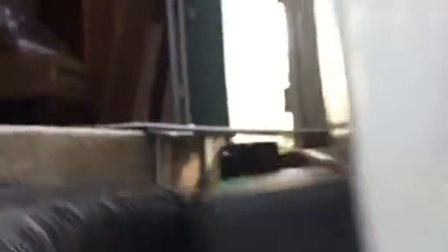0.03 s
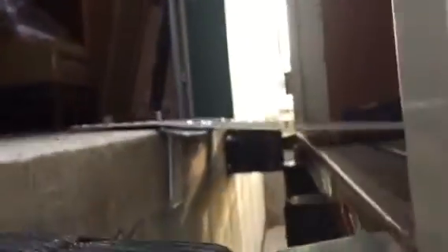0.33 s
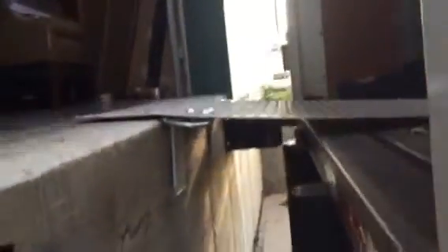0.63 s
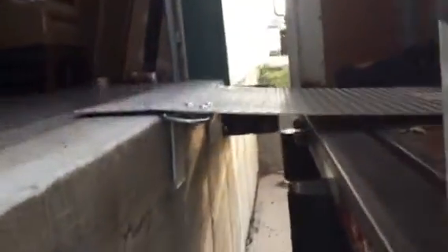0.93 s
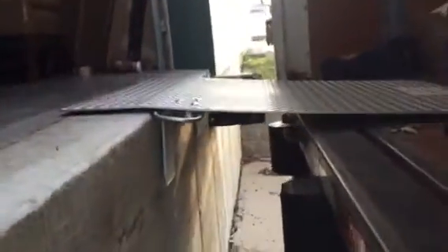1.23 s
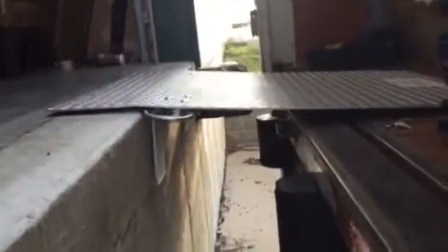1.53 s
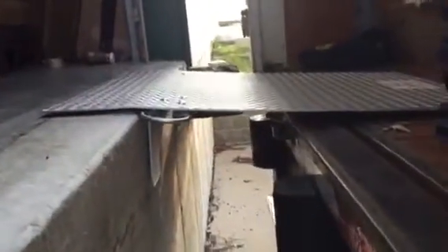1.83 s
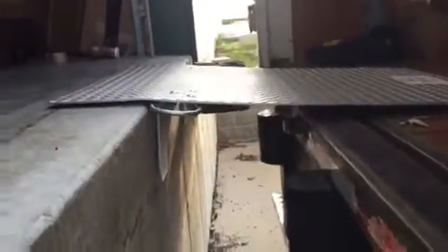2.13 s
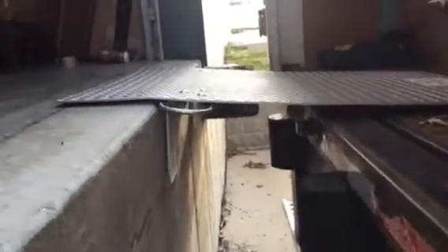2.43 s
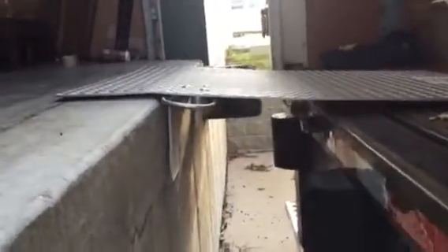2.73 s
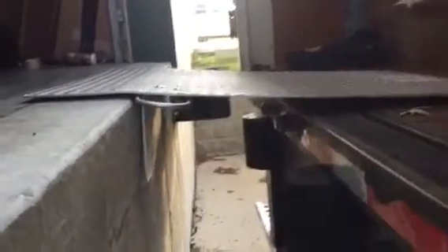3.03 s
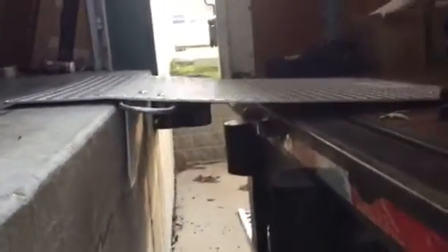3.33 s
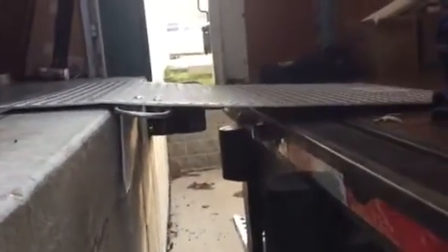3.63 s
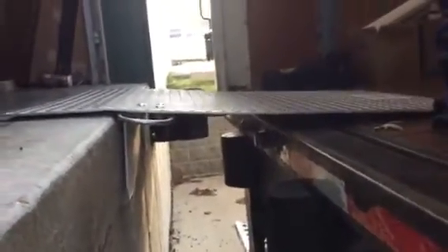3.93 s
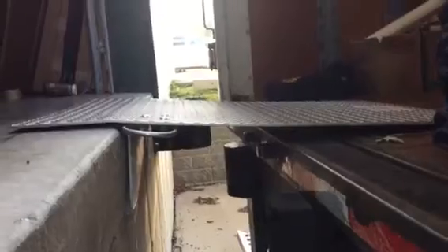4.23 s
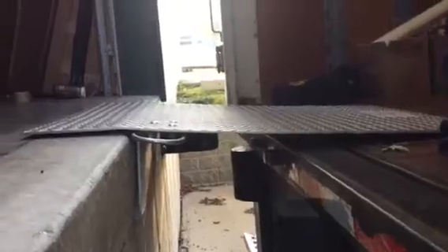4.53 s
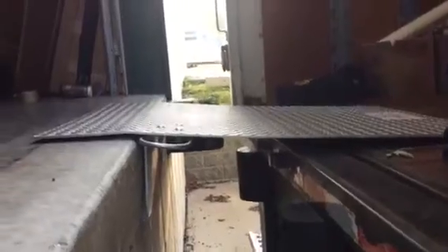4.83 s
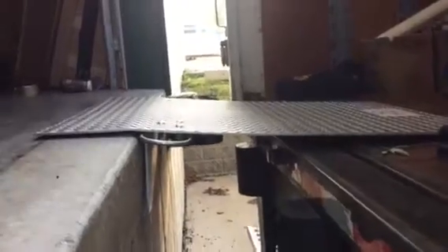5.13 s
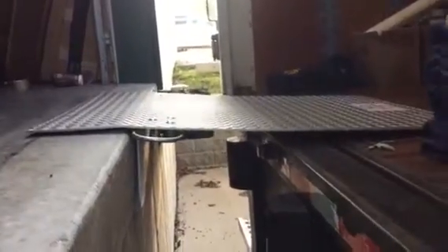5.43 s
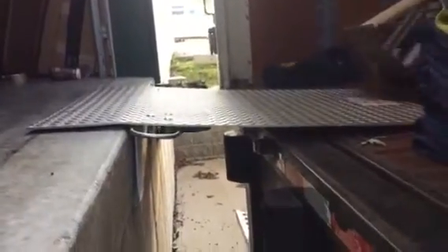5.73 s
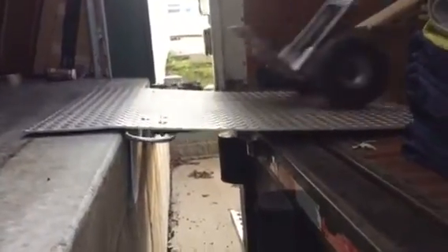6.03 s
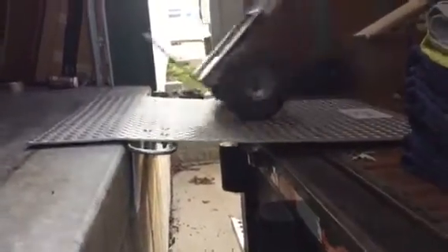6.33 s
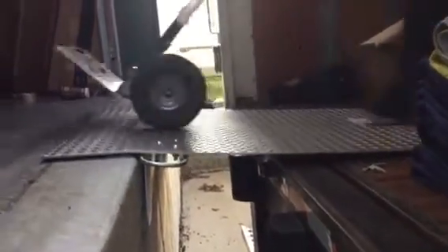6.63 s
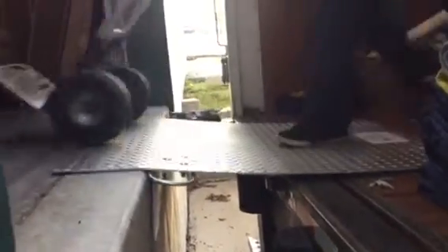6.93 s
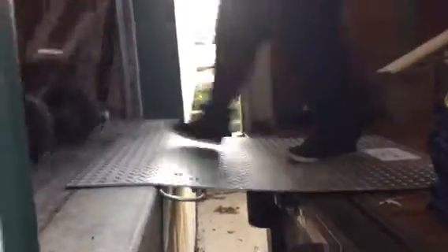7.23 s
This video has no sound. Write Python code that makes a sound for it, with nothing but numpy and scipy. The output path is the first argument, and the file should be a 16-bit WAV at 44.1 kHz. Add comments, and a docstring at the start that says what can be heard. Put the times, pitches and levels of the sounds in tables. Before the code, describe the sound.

Close rubbing and scuffing on the microphone, then a hand truck rolls over a metal dock plate with loud, low, ringing bangs.

```python
"""Hands and a sleeve rub and scuff right at the microphone as a camera is set in place on a loading dock,
over a low outdoor rumble. Then a hand truck rolls nearer across a metal dock plate, which slams on its
supports, rattles and rings, and a foot lands on it as the wheels leave. The bay answers each blow
and the camera's gain ducks."""
import sys
import numpy as np
from scipy import signal
from scipy.fft import rfft, irfft, next_fast_len
from scipy.io import wavfile
from scipy.ndimage import uniform_filter1d, map_coordinates

SR = 44100
rng = np.random.default_rng(int(sys.argv[2]) if len(sys.argv) > 2 else 0)


def to_wav(s):
    """Save 16-bit WAV."""
    ch = np.atleast_2d(s).T  # columns
    pcm = np.round(np.clip(ch, -1, 1) * 32767)  # PCM
    wavfile.write(sys.argv[1], SR, pcm.astype(np.int16))


N = 325458

# The plate strikes its supports. Each row: start in seconds, level in dB, contact hardness in dB.
BLOWS = [(5.962, -3.5, -15), (6.049, -10.5, -15.5), (6.09, -6, -18.5), (6.119, -13, -21),
         (6.14, 3.5, -15.5), (6.158, -7.5, -12), (6.2, -8, -19), (6.355, -19.5, -27), (6.743, -23, -16),
         (6.79, -14.5, -12), (6.845, -9, -9.5), (6.9, -7, -12), (6.965, -13, -24), (7.159, -27, -8)]
# The plate's strong modes, each a frequency in Hz.
MODE_HZ = [111, 167.5, 190, 243, 286, 300, 334, 378, 386, 410, 469, 554, 563, 747, 851, 886, 936, 987, 1018,
           1237, 1294, 1346, 1598, 1664, 1735, 1851, 1946, 2195, 2447, 2790]
# The same modes. Each row: level in dB struck at the truck end, at the dock end, t60 in seconds.
MODE_RESPONSE = [(-16, -33, 0.83), (1.5, -0.5, 0.87), (-4.5, 1, 0.77), (-13, -18, 0.67), (-7.5, -29, 0.75),
                 (-24, -4.5, 0.42), (-14.5, -36, 1), (-23, -11.5, 0.56), (-10, -21, 0.66), (-11, -12, 0.32),
                 (-8.5, -21, 0.75), (-2.5, -8, 0.53), (-22, 0.5, 0.15), (-3, 9, 0.099), (-12, -25, 0.31),
                 (-9, -20, 0.56), (-19, -14, 0.28), (2, 4, 0.16), (3.5, -2, 0.18), (1, -0.5, 0.21),
                 (4, -22, 0.11), (-2.5, -6, 0.22), (-4, 0, 0.22), (9, 8, 0.089), (11.5, -10, 0.055),
                 (1, -20, 0.13), (-1, -17, 0.14), (7, 17, 0.038), (4, 8, 0.076), (0, 5, 0.1)]
# The dense upper modes. Each row: frequency in Hz, level in dB.
CLANG_TONE = [(65, -12), (110, -1.5), (227, -1), (372, -3), (1050, -6.5), (1440, -8), (1680, -1),
              (2350, -2), (3840, -12), (4960, -22), (5260, -18.5), (7350, -29), (8940, -29), (10700, -46),
              (12000, -45.5), (15600, -67), (22000, -120)]
# How long they ring. Each row: frequency in Hz, t60 in seconds.
CLANG_DECAY = [(120, 0.85), (400, 0.45), (1000, 0.42), (2500, 0.16), (8000, 0.27)]


def plate():
    """Every blow feeds the plate's strong modes and a dense clang; slow bending waves delay the boom."""
    out, t = np.zeros(N), np.arange(SR) / SR
    hz = np.array(MODE_HZ)[:, None]
    truck_end_db, dock_end_db, t60 = np.transpose(MODE_RESPONSE)[:, :, None]
    clock = np.arange(round(5.9 * SR), N) / SR  # from just before the first blow
    energy = np.zeros((len(hz), len(clock)))
    decay = ((1 - np.exp(-t * hz / 5.1)) * amp(-60 * t / t60)) ** 2
    bending = lambda f: np.exp(-2j * np.pi * .22 * np.sqrt(f))  # travel time falls with frequency
    for s, db, hardness_db in BLOWS:
        boom_db = -5 - 0.22 * db  # weak blows are slow and give more boom for their size
        contact = [(280, boom_db), (800, 0), (2300, hardness_db + 7)]  # hard contacts are bright
        mode_db = truck_end_db if s < 6.5 else dock_end_db
        sizes = amp(db + mode_db + along(contact, hz) + rng.standard_normal(hz.shape))
        i = np.searchsorted(clock, s)
        energy[:, i:i + len(t)] += sizes ** 2 * decay[:, :len(clock) - i]
        waves = rng.standard_normal(len(t))  # reflections from the plate's edges
        waves[round(.0005 * SR)] += 17  # the direct wave
        clang = shaped(coloured(waves, CLANG_TONE), contact)
        add(out, s, amp(db - 12) * filtered(dying(clang, CLANG_DECAY), bending))
    detuning = rng.normal(0, 0.00077, energy.shape) * np.sqrt(hz)  # from the moving load
    phase = 2 * np.pi * (hz * clock + rng.random(hz.shape)) + np.cumsum(detuning, axis=1)
    ring = np.sqrt(energy) * np.sin(phase)
    add(out, clock[0], amp(-19) * ring.sum(axis=0))
    return out


# Tyres, axle and deck, heard from the dock. Each row: frequency in Hz, level in dB.
TREAD_TONE = [(1470, -22), (2500, -23), (2720, -21.5), (3240, -24), (4500, 3), (4930, -7), (5700, 2),
              (7680, -2.5), (10300, -2), (14000, -4.5), (15500, -7)]
AXLE_TONE = [(590, -56), (1000, -33), (1350, -26), (1930, 8.5), (2080, -4.5), (2300, -1.5), (2810, 2),
             (3240, 3.5), (3910, 1), (4910, -4.5), (5500, -3), (7150, -55.5), (12100, -120)]
DRUM_TONE = [(71, -43), (120, -18.5), (167, -10.5), (248, -13), (322, -11), (422, -16), (567, -9),
             (933, -12), (1800, -12.5), (2340, -15), (3960, -120)]
# Their course as the truck nears. Each holds: level in dB, rise in seconds, growth in dB a second.
TREAD_COURSE = (-47, 0.19, 3.7)
AXLE_COURSE = (-48.5, 0.1, 7.36)
DRUM_COURSE = (-43.5, 0.088, -1.55)
# The axle's resonances. Each row: frequency in Hz, width in Hz, lift in dB.
AXLE_RING = [(1874, 19, 3.5), (2244, 67, 13), (2417, 97, 9), (2770, 78, 7), (3900, 82, -4)]
ROLL_START_S, WHEELS_OFF_S, WHEELS_OFF_DB = 5.59, 6.96, -5
CHATTER_DB, CHATTER_T60_S = -25.5, 0.38


def hand_truck():
    """Tyres hiss on the tread pattern, the axle whirrs and the deck drums, most of all after a blow."""
    chatter, t = np.zeros(N), np.arange(SR) / SR
    for s, db, _ in BLOWS:
        add(chatter, s, amp(db + CHATTER_DB - 60 * t / CHATTER_T60_S) ** 2)
    tread = approach(*TREAD_COURSE) * coloured(grit(N, spiky=0.28), TREAD_TONE)
    axle = approach(*AXLE_COURSE) * amp(0.97 * wobble(40))
    axle *= resonant(coloured(grit(N, spiky=0.2), AXLE_TONE), AXLE_RING)
    drum = np.sqrt(approach(*DRUM_COURSE) ** 2 + chatter) * amp(0.45 * wobble(25))
    drum *= coloured(rng.standard_normal(N), DRUM_TONE)
    on_dock = np.clip((np.arange(N) / SR - WHEELS_OFF_S) / 0.046, 0, 1)
    return tread + axle + drum * amp(WHEELS_OFF_DB * on_dock)


def approach(db, rise_s, growth_db_per_s):
    """A rolling sound rises as the truck is pushed off, then grows or fades steadily."""
    age = np.maximum(np.arange(N) / SR - ROLL_START_S, 0)
    return np.minimum(age / rise_s, 1) ** 2 * amp(db + growth_db_per_s * age)


# The grip shifts on the camera. Each row: start in seconds, level in dB, hollow in Hz, hiss in dB.
SCUFFS = [(0.018, -47.5, 2280, -11), (0.329, -38.5, 6000, 2), (2.05, -37, 3440, -6), (2.138, -39, 1730, -7),
          (2.1847, -30.5, 1660, -19), (2.2119, -27.5, 1440, -11), (2.2503, -26.5, 1290, -11.5),
          (2.288, -35, 1750, -15), (2.4879, -35.5, 1610, -4), (2.5297, -41, 1170, -5),
          (2.6107, -29.5, 1490, -11), (2.6828, -32, 2090, -18), (2.8105, -29.5, 1850, -20),
          (2.8353, -30, 1840, -12), (2.878, -29.5, 1300, -11), (2.896, -23, 1380, -21),
          (3.034, -34, 1200, -14.5), (3.3743, -27, 1440, -12.5), (3.7912, -26, 2740, -13),
          (3.8165, -25, 2850, -9.5), (3.8793, -24.5, 2630, -15), (3.9452, -29, 2960, -15.5),
          (4.3191, -38, 3500, -7.5), (4.568, -51, 1120, -6), (4.602, -42.5, 1040, -43),
          (4.9555, -33.5, 1400, -6.5), (5.1023, -43.5, 3500, -19), (5.313, -34, 1794, -28),
          (5.3819, -32.5, 1820, -23), (5.4958, -37.5, 1520, -12), (5.5436, -42, 1100, -9)]
# The slipping hand. Each row: frequency in Hz, level in dB.
SCUFF_TONE = [(240, -34), (400, 0), (432, -33), (466, -12), (900, -6.5), (1260, -7), (2510, -8.5),
              (4030, -9), (4350, -10.5), (5560, -13), (10300, -18), (13900, -20), (15500, -27)]
SCUFF_FIRM_DB, SCUFF_T60_S = -39, 0.2


def scuffs():
    """Each shift of the grip lets go a dying shower of slips that rings the hollow under the hand."""
    out, t = np.zeros(N), np.arange(SR // 4) / SR
    for s, db, hollow_hz, hiss_db in SCUFFS:
        body_db = 1.5 - 9.5 * np.log2(hollow_hz / 1600)  # a smaller, higher hollow has less body
        tilt = [(1400, body_db), (3300, 0), (8000, hiss_db + 14), (14000, 1.3 * hiss_db + 17)]
        slips = shaped(coloured(grit(len(t), spiky=0.25), SCUFF_TONE), tilt)
        touched = [(hz, 110, 4) for hz in rng.uniform(1300, 7000, size=5)]
        slips = resonant(slips, [(hollow_hz, hollow_hz / 8, 8)] + touched)
        # Light, hissy touches swell; firm ones snap.
        firm = np.clip((db - SCUFF_FIRM_DB) / 10, 0, 1) * np.clip(-hiss_db / 18, 0, 1)
        rise_s = 0.0018 * (1 - firm) + 0.0019
        snap = 1.3 * firm * np.exp(-t / .005)
        fall = snap + amp(-60 * t / SCUFF_T60_S) + 0.018 * amp(-60 * t / 0.35)
        add(out, s, amp(db - 11) * slips * (1 - np.exp(-t / rise_s)) * fall)
    return out


# One long sleeve stroke across the microphone. Each row: time in seconds, drag in dB.
SLEEVE_DRAG = [(3.06, -69), (3.19, -46), (3.3, -49.5), (3.56, -49.5), (3.7, -41.5), (3.79, -42.5),
               (3.87, -56)]
# The cloth's hiss. Each row: frequency in Hz, level in dB.
SLEEVE_TONE = [(240, -36), (400, -17), (535, -7.5), (821, -22), (1260, -7.5), (1850, -10.5), (1990, -9.5),
               (4220, -4.5), (4920, -9.5), (14600, -14), (15500, -16)]
PRESS_S, PRESS_WIDTH_S = 3.534, 0.11
GAP_OPEN_HZ, GAP_CLOSED_HZ, GAP_CLOSES_S, GAP_CLOSING_S = 1744, 3200, 3.7, 0.04


def sleeve():
    """Cloth drags past the microphone; the gap under it narrows and its resonance climbs."""
    t = np.arange(N) / SR
    drag_db, = curves(SLEEVE_DRAG)
    pressure = np.exp(-((t - PRESS_S) / PRESS_WIDTH_S) ** 2 / 2)
    closed = 1 / (1 + np.exp(np.minimum((GAP_CLOSES_S - t) / GAP_CLOSING_S, 20)))
    gap_hz = GAP_OPEN_HZ + (GAP_CLOSED_HZ - GAP_OPEN_HZ) * closed
    rasp_db = -1.5 + 9.5 * pressure - 3 * closed  # the closed gap rings more weakly
    rasp = amp(rasp_db) * gliding(grit(N, spiky=0.078), gap_hz, width_hz=520)
    hiss = amp(3) * coloured(grit(N, spiky=0.28), SLEEVE_TONE)
    return during(SLEEVE_DRAG) * amp(drag_db + 0.89 * wobble(60)) * (hiss + rasp)


# Fingers stroke the case beside the microphone.
# Each row: start and length in seconds, hiss and rasp in dB, easing off in dB a second.
STROKES = [(0.02, 0.32, -71, -80, -15), (0.52, 0.025, -52, -63, 40), (0.569, 0.17, -46, -60.5, 21),
           (0.889, 0.18, -43.5, -58.5, 67), (1.124, 0.056, -55, -50.5, 28), (1.209, 0.095, -50, -57, 63),
           (1.348, 0.16, -52.5, -58, 21), (1.555, 0.11, -49, -50, 20), (1.646, 0.15, -47.5, -55, 25),
           (1.807, 0.068, -59.5, -57, 20), (1.891, 0.057, -59, -48, 30), (5.146, 0.068, -55, -56.5, 73),
           (5.284, 0.13, -62, -67, 20)]
# Skin gliding and skin pressed down. Each row: frequency in Hz, level in dB.
GLIDE_TONE = [(1180, -26), (2000, -2), (2610, -4.5), (3580, -11), (3970, -7.5), (4440, 0.5), (4880, -4.5),
              (6090, 1), (7420, -4.5), (14700, -7.5), (15500, -19)]
RASP_TONE = [(240, -49), (400, -23), (520, 0), (927, 1), (1740, -2), (2130, 0.5), (3160, -2.5), (4500, -11),
             (5850, -33), (9900, -120)]
# The camera case's resonances. Each row: frequency in Hz, width in Hz, lift in dB.
CASE_RING = [(2040, 210, 2), (2560, 50, 11), (3020, 190, -7), (6100, 300, 8)]
# Fingertips squeak at random between these two times, in seconds.
SQUEAK_SPAN_S = (0.95, 1.9)
SQUEAK_HZ, SQUEAK_DB, SQUEAK_T60_S, CATCHES_PER_S = 6080, -45, 0.031, 190


def fingers():
    """Skin slides on the case: a grainy hiss, a pressed rasp, catches that ring it, and tiny squeaks."""
    out, t = np.zeros(N), np.arange(SR // 16) / SR
    hiss = coloured(grit(N, spiky=0.4), GLIDE_TONE)
    catches = (rng.random(N) < CATCHES_PER_S / SR) * rng.uniform(.4, 1, N)
    catches = signal.fftconvolve(catches, np.exp(-t / .002))[:N] * rng.standard_normal(N)
    case = resonant(coloured(catches, RASP_TONE), CASE_RING)
    rasp = .68 * coloured(grit(N, spiky=.3), RASP_TONE) + .72 * case
    for s, length, hiss_db, rasp_db, easing in STROKES:
        out += stroke(s, length, easing) * (amp(hiss_db) * hiss + amp(rasp_db) * rasp)
    for s in rng.uniform(*SQUEAK_SPAN_S, size=12):
        hz = SQUEAK_HZ * rng.normal(1, .02)
        jitter = np.cumsum(rng.normal(0, 0.094, len(t)))
        envelope = (1 - np.exp(-t / 0.0019)) * amp(-60 * t / SQUEAK_T60_S)
        add(out, s, amp(SQUEAK_DB) * envelope * np.sin(2 * np.pi * hz * t + jitter))
    return out * amp(1.5 * wobble(69.4))


def stroke(start, length, easing_db_per_s, attack_s=0.008, release_s=0.032):
    """A stroke bites quickly, eases off (or swells, if the easing is negative) and lets go."""
    out, age = np.zeros(N), np.arange(SR // 2) / SR
    bite = 1 - np.exp(-age / attack_s)
    release = np.exp(-np.maximum(age - length, 0) / release_s)
    add(out, start, bite * amp(-easing_db_per_s * np.minimum(age, length)) * release)
    return out


# Fingernails on the camera. Each row: start in seconds, level in dB.
NAIL_TICKS = [(0.578, -28), (0.894, -29), (2.2126, -32), (2.685, -30), (3.019, -41), (5.238, -48),
              (5.286, -38), (5.314, -35), (5.384, -28.5), (5.495, -36)]
# A nail's click. Each row: frequency in Hz, level in dB.
TICK_TONE = [(700, -15), (1800, 0.5), (4000, -2), (7000, 2.5), (11000, -6), (15500, -25)]


def nails(t60_s=0.032):
    """A nail catches on the case and rings it for an instant."""
    out, t = np.zeros(N), np.arange(SR // 16) / SR
    for s, db in NAIL_TICKS:
        tick = resonant(coloured(rng.standard_normal(len(t)), TICK_TONE), CASE_RING)
        add(out, s, amp(db - 12) * tick * amp(-60 * t / t60_s))
    return out


# Bumps on the camera, then out on the plate. Each row: start in seconds, level in dB, resonance in Hz.
BUMPS = [(0.045, -35, 104), (0.085, -37, 130), (0.198, -43, 296), (0.356, -31, 230), (0.367, -26.5, 100),
         (1.135, -38, 277), (1.889, -28, 171), (2.185, -38, 400), (2.212, -40, 365), (2.25, -38, 376),
         (2.396, -42.5, 60), (2.835, -30, 198), (4.418, -32.5, 228), (4.589, -45, 186), (6.16, -24, 80),
         (6.944, -19, 180), (6.985, -22.5, 294), (7.039, -23.5, 187)]
# Their dull thud. Each row: frequency in Hz, level in dB.
BUMP_TONE = [(22, -50), (35, -15), (60, 0.5), (225, -6), (416, -16.5), (665, -15), (879, -26), (1160, -17),
             (1470, -28.5), (2000, -30), (2600, -50), (4400, -120)]


def bumps(overtone_ratio=2.98, t60_s=0.27):
    """Soft knocks of hands, tyres and shoes, each with a damped resonance and its overtone."""
    out, t = np.zeros(N), np.arange(SR // 4) / SR
    for s, db, body_hz in BUMPS:
        knock_db = 2 + 8 * np.log2(body_hz / 200)  # higher knocks are harder
        push = coloured(rng.standard_normal(len(t)), BUMP_TONE)
        push = shaped(push, [(200, 0), (550, knock_db)])
        push = resonant(push, [(body_hz, 70, 9), (overtone_ratio * body_hz, 40, 6.5)])
        add(out, s, amp(db - 7.5) * push * (1 - np.exp(-t / 0.0026)) * amp(-60 * t / t60_s))
    return out


# The bay around the microphone. Each row: frequency in Hz, t60 in seconds.
BAY_DECAY = [(150, 1), (1000, 0.22), (4000, 0.19), (12000, 0.13)]


def bay(x, delay_s=0.016):
    """The dock walls and the truck box answer with a short tail, longest in the bass."""
    tail = dying(rng.standard_normal(SR), BAY_DECAY)
    delayed = np.pad(x, (round(delay_s * SR), 0))
    return signal.fftconvolve(delayed, tail / np.linalg.norm(tail))[:N]


# The distant yard and the open air. Each row: frequency in Hz, level in dB.
RUMBLE_TONE = [(15, -71), (25, -37), (41, -10.5), (71, 1), (89, -3), (107, -12.5), (129, -9.5), (172, -17),
               (200, -15.5), (288, -27.5), (370, -33), (500, -30.5), (650, -51), (1100, -120)]
AIR_TONE = [(180, -21.5), (300, -2), (378, -25), (424, -20), (600, -25), (953, -13), (1160, -13.5),
            (2040, -18.5), (2140, -17.5), (3510, -34), (3940, -30), (15500, -38.5)]
# The air at the microphone. Each row: time in seconds, level in dB, hollow resonance in Hz.
AIR_COURSE = [(0.0, -59.5, 1039), (1.55, -59.5, 836.5), (2.05, -52, 906), (3.1, -56.5, 1107),
              (3.65, -50, 1148), (4.0, -59.5, 1218), (5.55, -58.5, 1134)]
# Its steady resonances. Each row: frequency in Hz, width in Hz, lift in dB.
AIR_RING = [(3050, 140, 0), (3430, 340, 5)]


def outdoors(rumble_db=-47):
    """Low rumble from the yard and faint air noise whose hollow colour shifts as the camera moves."""
    rumble = amp(rumble_db - 0.5 * wobble(6)) * coloured(rng.standard_normal(N), RUMBLE_TONE)
    air_db, hollow_hz = curves(AIR_COURSE)
    air = resonant(coloured(rng.standard_normal(N), AIR_TONE), AIR_RING)
    hollow = gliding(rng.standard_normal(N), hollow_hz, width_hz=124)
    return rumble + amp(air_db) * (amp(-4.5) * air + amp(-11) * hollow)


def amp(db):
    """Decibels to gain."""
    return 10 ** (np.asarray(db) / 20)


def unit(x):
    """Scale to rms 1."""
    return x / np.sqrt(np.mean(x ** 2) + 1e-20)


def along(points, hz):
    """Interpolate (Hz, value) points on a log axis."""
    f, v = np.transpose(points)
    return np.interp(np.log(hz + 1), np.log(f + 1), v)


def curves(rows):
    """One value per sample for each column after the time."""
    s, *cols = np.transpose(rows)
    return [np.interp(np.arange(N) / SR, s, c) for c in cols]


def during(rows):
    """1 while a table runs, with short soft edges."""
    t = np.arange(N) / SR
    return uniform_filter1d(((t >= rows[0][0]) & (t <= rows[-1][0])) * 1., size=400)


def wobble(rate):
    """A smooth random curve, rate knots a second."""
    knots = rng.standard_normal(int(N * rate / SR) + 4)
    return map_coordinates(knots, [np.arange(N) * rate / SR])


def grit(n, spiky):
    """Friction: tiny slips of very unequal size."""
    return rng.standard_normal(n) * np.exp(spiky * np.repeat(rng.standard_normal(n // 16 + 1), 16)[:n])


def filtered(x, response):
    """x times a response of frequency."""
    m = next_fast_len(len(x) + 8192)
    return irfft(rfft(x, m) * response(np.fft.rfftfreq(m, 1 / SR)), m)[:len(x)]


def shaped(x, tone):
    """x through a curve of (Hz, dB) points."""
    return filtered(x, lambda hz: amp(along(tone, hz)))


def coloured(x, tone):
    """x given a spectrum, at rms 1."""
    return unit(shaped(x, tone))


def resonant(x, peaks):
    """x lifted by (Hz, width Hz, dB) resonances, at rms 1."""
    lift = lambda f: 1 + sum(amp(db) * 1j * f * w / (c * c - f * f + 1j * f * w) for c, w, db in peaks)
    return unit(filtered(x, lift))


def gliding(x, centre_hz, width_hz):
    """A narrow band of noise that follows a moving resonance, at rms 1."""
    band = filtered(x, lambda hz: 1 / (1 + (hz / width_hz) ** 2))
    return unit(band * np.sin(2 * np.pi * np.cumsum(centre_hz) / SR))


def dying(x, decay):
    """Each frequency of x dies at its own speed."""
    hz, t, z = signal.stft(x, SR, nperseg=256)
    return signal.istft(z * amp(-60 * t / along(decay, hz)[:, None]), SR, nperseg=256)[1][:len(x)]


def add(track, s, x):
    """Mix x into the track at time s."""
    i = max(round(s * SR), 0)
    track[i:i + len(x)] += x[:max(N - i, 0)]


def gain_control(x, knee_db=-28, squeeze=0.34, attack_s=0.057, recovery_db_per_s=16.5):
    """Loud sound pulls the camera's gain down quickly; it creeps back at a steady rate."""
    level_db = 10 * np.log10(np.abs(uniform_filter1d(x ** 2, size=440)) + 1e-12)
    over_db = np.maximum(level_db - knee_db, 0)
    creep_db = recovery_db_per_s * np.arange(N) / SR
    cut_db = np.maximum.accumulate(squeeze * over_db + creep_db) - creep_db
    keep = np.exp(-1 / (attack_s * SR))
    return x * amp(-signal.lfilter([1 - keep], [1, -keep], cut_db))


def scene():
    """The plate and hand truck in the bay, handling right at the microphone, the yard far behind."""
    bangs = plate()
    dock = bangs + amp(-18) * bay(bangs) + hand_truck()
    handling = fingers() + sleeve() + scuffs() + nails()
    return (dock + handling + bumps() + outdoors())[None]


def record(dry):
    """The camera's mono microphone: gain that ducks after bangs, a notch from its port, a band limit."""
    notch_hz, top_hz = 10400, 15600
    port = lambda hz: amp(-5 * np.exp(-((hz - notch_hz) / 300) ** 2))
    return filtered(gain_control(dry[0]), lambda hz: port(hz) * (hz < top_hz))[None]


dry = scene()
out = record(dry)
to_wav(out)
```